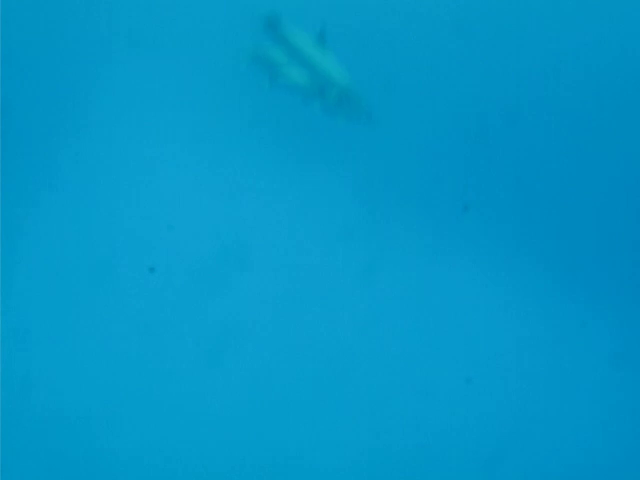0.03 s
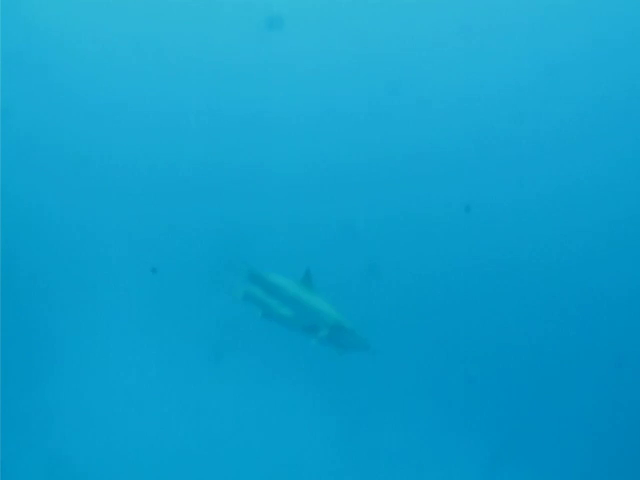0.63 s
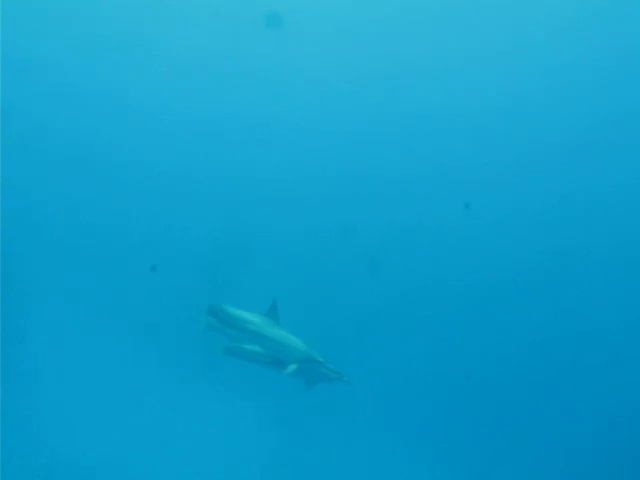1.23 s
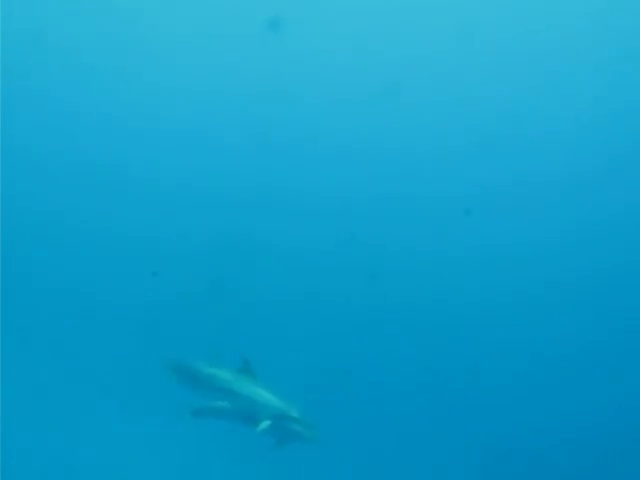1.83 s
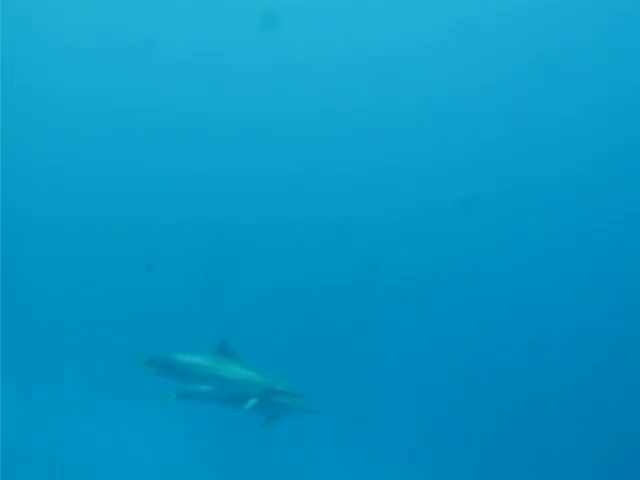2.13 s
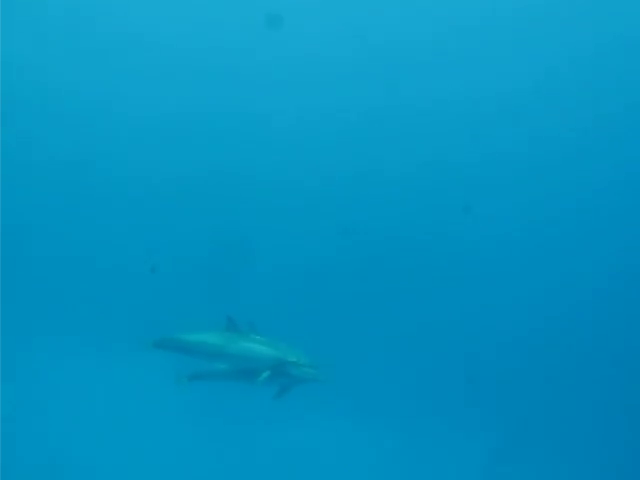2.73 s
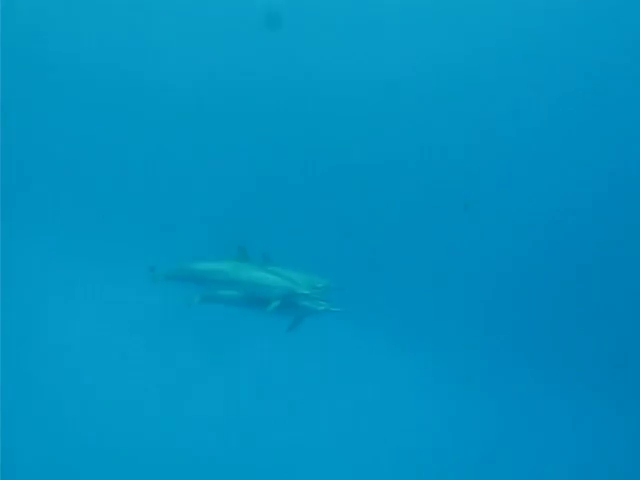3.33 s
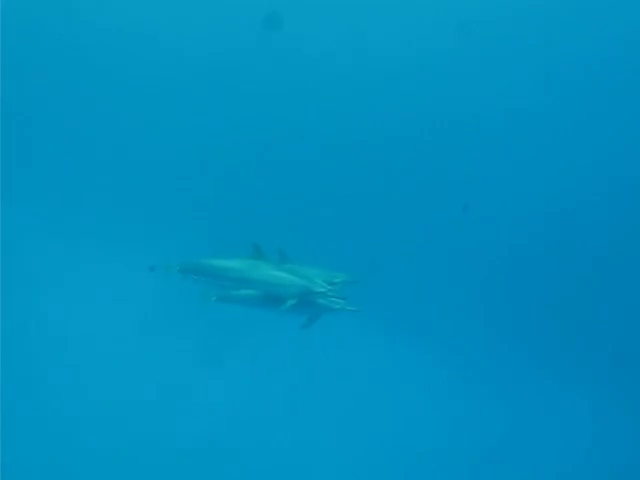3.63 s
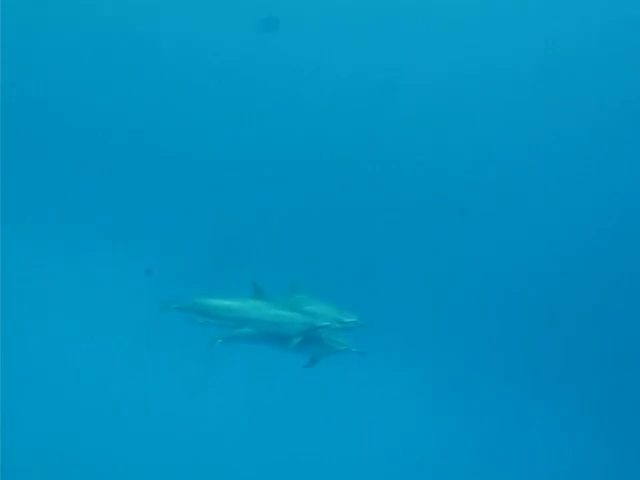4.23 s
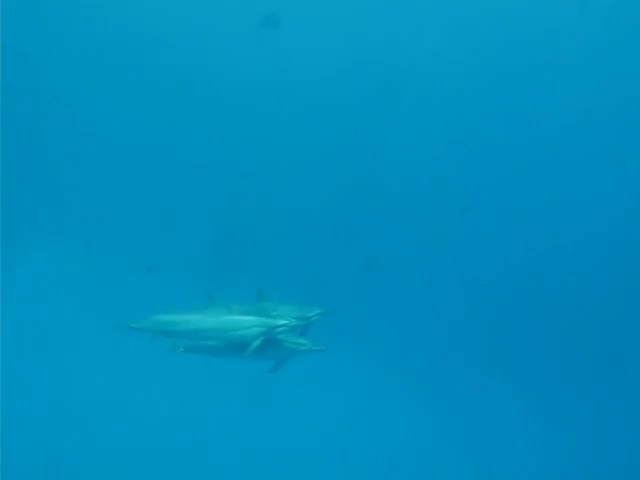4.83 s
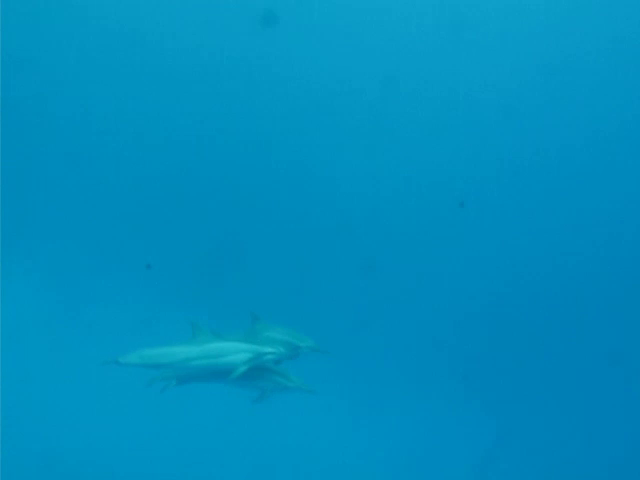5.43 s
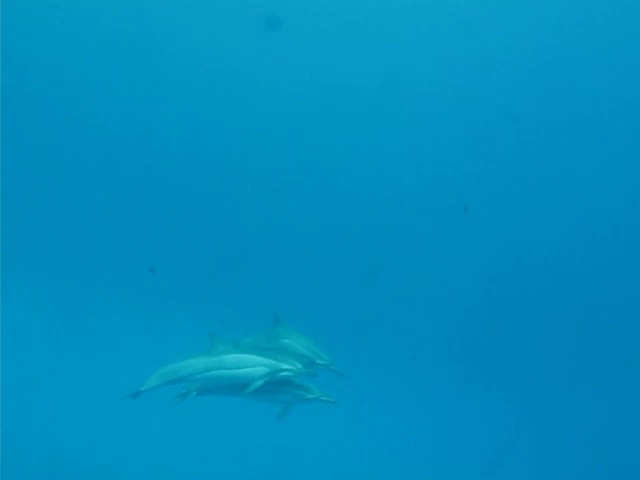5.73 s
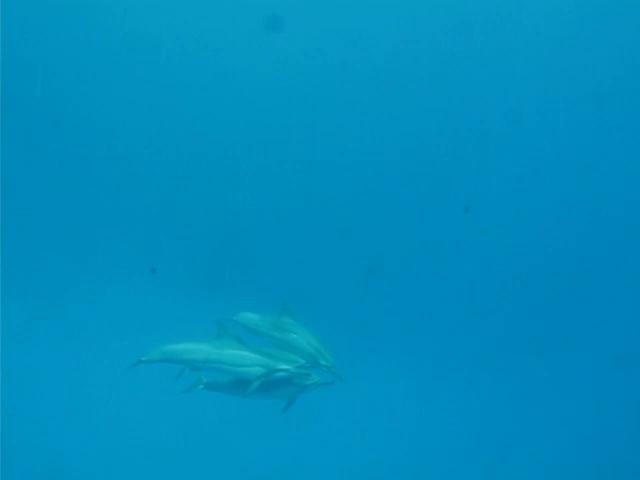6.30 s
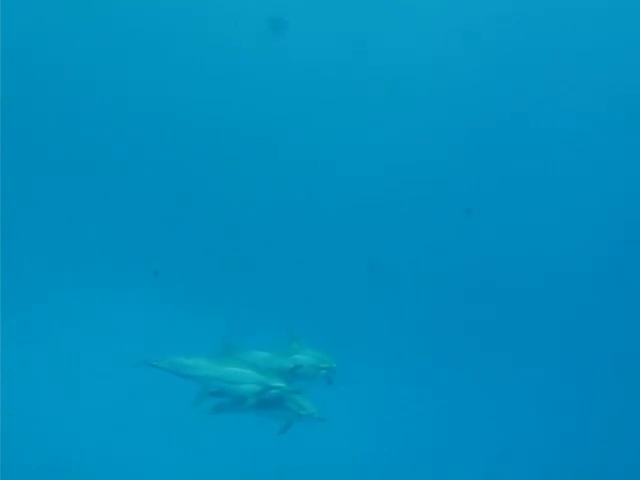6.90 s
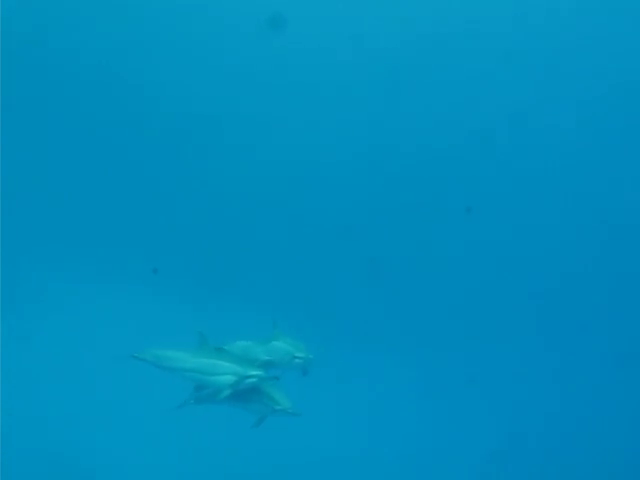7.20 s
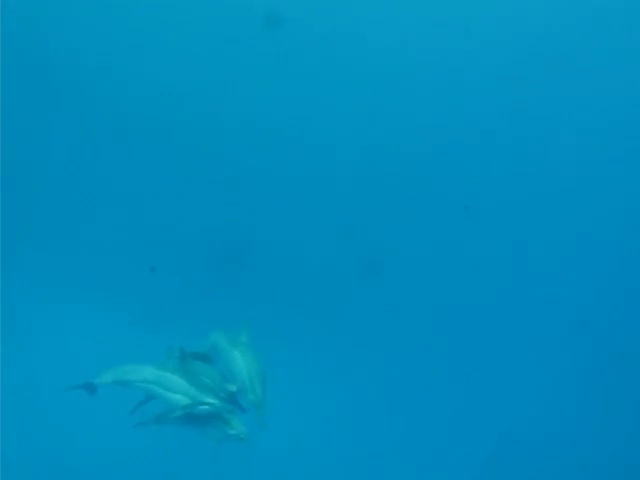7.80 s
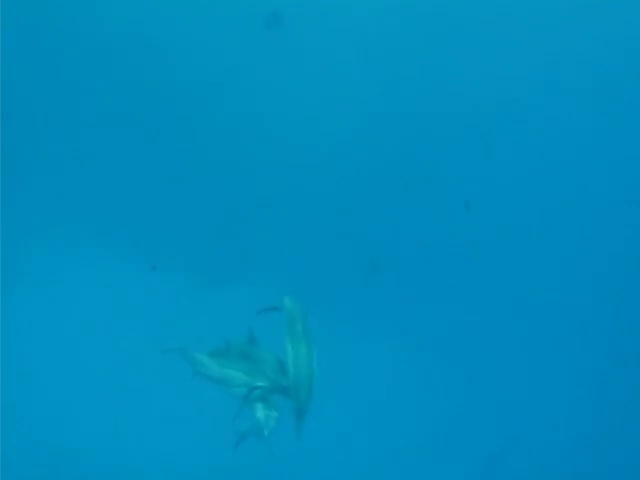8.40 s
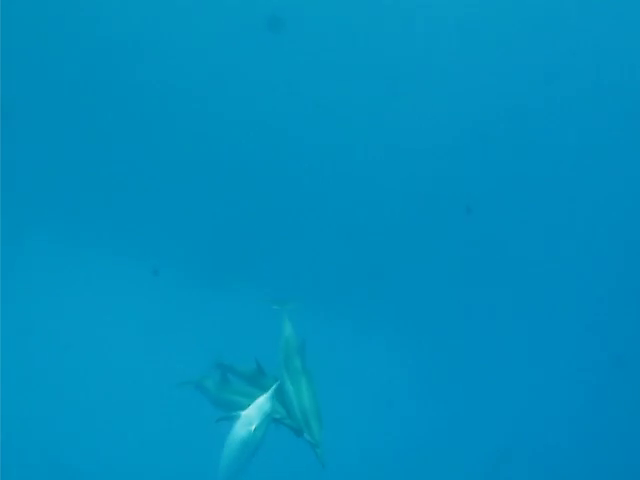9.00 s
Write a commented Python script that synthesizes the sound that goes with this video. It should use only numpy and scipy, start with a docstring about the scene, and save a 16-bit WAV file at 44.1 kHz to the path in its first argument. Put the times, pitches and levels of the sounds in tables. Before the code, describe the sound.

Underwater rumble, hiss and a high electronic whine continue while a camera housing knocks and rubs, and dolphins send out rapid click trains.

```python
"""Under the sea, heard through the enclosed microphone of a camera in a hand-held housing.
Low rumble, hiss, the camera's thin whine and its faint 30 Hz ticking run throughout. From the start
the housing ticks, cracks and rubs right at the microphone, ringing with its own modes, among bubble
pings and sparse snaps. From about 4 s passing dolphins scan it with click trains, and water gurgles
against it. The heaviest blow lands near 7 s; short dolphin buzzes and faint whistles follow."""
import sys
import numpy as np
from scipy import signal
from scipy.fft import rfft, irfft, next_fast_len
from scipy.io import wavfile
from scipy.ndimage import uniform_filter1d

SR = 44100
rng = np.random.default_rng(int(sys.argv[2]) if len(sys.argv) > 2 else 0)


def inscribe(sig):
    """Save sig as 16-bit PCM at rate SR to the path in sys.argv[1].

    A 1-D sig is mono; a 2-D sig holds one channel per row.
    Samples are clipped to [-1, 1] before scaling.
    """
    pcm = np.round(np.clip(np.atleast_2d(sig).T, -1, 1) * 32767)
    wavfile.write(sys.argv[1], SR, pcm.astype(np.int16))


N = 403515
T = np.arange(N) / SR

# Blows on the housing. Each row: start in seconds, level in dB, bass in dB above that,
# frequency that rings most in Hz, treble lost by a soft contact in dB.
KNOCKS = [(0.2142, -26, -14.5, 1090, 1.5), (0.272, -52, 1.5, 1550, 38), (0.665, -44.5, -12, 840, 17),
          (0.673, -50, -10, 1630, 12), (0.738, -42, -10, 2120, 17), (0.946, -52.5, -6, 1110, 21),
          (1.087, -57.5, 2.5, 1360, 16), (1.709, -54, 2.5, 1560, 24), (2.087, -46.5, -22, 1630, 28),
          (3.423, -52.5, -1, 1520, 28), (3.561, -45, -13, 1330, 12), (3.777, -55, 2, 900, 13),
          (4.139, -58.5, -7, 1030, 9), (4.201, -53.5, -20, 1630, 2), (5.253, -52.5, -1, 1590, 30),
          (5.436, -55, 2.5, 1570, 30), (5.49, -57, -7, 1540, 14), (5.737, -47, -10, 1550, 23),
          (5.789, -54, -8, 1680, 3), (5.904, -51.5, -7, 1140, 34), (5.924, -51, 1, 1520, 17),
          (5.944, -51.5, -1, 990, 20), (6.8818, -33.5, -14, 1120, 2), (6.9006, -22, -11, 960, 7.5),
          (7.772, -59.5, 0, 790, 28), (8.696, -49.5, -2.5, 1610, 30), (8.711, -53, -8, 1560, 32)]
# What a dolphin's click rings in the housing wall. Each row: frequency in Hz, width in Hz, level in dB.
WALL_RING = [(5000, 500, -14), (7200, 500, -15), (8800, 450, -11), (9700, 500, -1), (10250, 500, -1),
             (11100, 500, -7), (12700, 600, -12), (13750, 500, -14), (15400, 900, -20)]


def undb(db):
    """Decibels to gain."""
    return 10 ** (np.asarray(db) / 20)


def level(x, db):
    """Scale to an rms level."""
    return x * undb(db) / np.sqrt(np.mean(x ** 2))


def burst_level(x, db):
    """Scale so that the loudest 3 ms have this rms level."""
    return x * undb(db) / np.sqrt(uniform_filter1d(x ** 2, size=132, mode="constant").max())


def add(out, s, x):
    """Mix x into out at time s."""
    i = max(int(s * SR), 0)
    out[i:i + len(x)] += x[:max(N - i, 0)]


def band(x, lo_hz, hi_hz, order=5):
    """Causal band-pass."""
    sos = signal.butter(order, [lo_hz, min(hi_hz, SR / 2 - 1)], "band", fs=SR, output="sos")
    return signal.sosfilt(sos, x)


def noise(colour):
    """Noise of unit rms, its spectrum shaped by (Hz, dB) points."""
    hz, db = np.transpose(colour)
    f = np.fft.rfftfreq(next_fast_len(N, True), 1 / SR)
    gain = undb(np.interp(np.log(f + 1), np.log(hz), db, right=-99))
    white = rng.standard_normal(len(f)) + 1j * rng.standard_normal(len(f))
    return level(irfft(gain * white)[:N], 0)


def walk(rate):
    """Random drift with a spread near 1, turning rate times a second."""
    count = int(T[-1] * rate) + 2
    return np.interp(T * rate, np.arange(count), rng.standard_normal(count))


def ring(resonances, scatter_db, count=700):
    """Short ring of steep (Hz, width in Hz, dB) resonances, their levels scattered at random."""
    hz, width, db = np.transpose(resonances)[:, :, None]
    t = np.arange(count) / SR
    polarity = (-1) ** np.arange(len(hz))[:, None]
    size = width * undb(db + scatter_db * rng.standard_normal(hz.shape)) * polarity
    age = 1.55 * np.pi * width * t
    return (size * age * np.exp(-age) * np.sin(2 * np.pi * hz * t)).sum(0)


def rattle(x, decay_s, share, count=500):
    """Sound bounces along many paths: a dense, short tail smears it with little colouring."""
    tail = rng.standard_normal(count) * np.exp(-np.arange(count) / SR / decay_s)
    tail *= share / np.linalg.norm(tail)
    tail[0] += 1  # the direct path
    phase = np.angle(rfft(tail, 2 * count))
    return signal.fftconvolve(x, irfft(np.exp(1j * phase))[:count])


def background(rumble_db=-65.5, swell_db=0.14, hiss_db=-65):
    """Low water rumble all around, and smooth hiss."""
    # Two spectra. Each row: frequency in Hz, relative level in dB.
    rumble_colour = [(12, -46), (20, 2), (38, 0.5), (70, -4.5), (160, -6), (191, -9), (365, -4.5),
                     (452, -6), (541, -7), (636, -10), (721, -6), (788, -8), (926, -10.5), (1010, -7.5),
                     (1450, -13.5), (1880, -52), (3190, -120)]
    hiss_colour = [(1250, -14), (1500, 3.5), (2100, 1), (3100, 1.5), (3550, 2.5), (4250, -1.5), (5000, 0.5),
                   (6400, -1), (7800, -3.5), (9100, 1.5), (10100, -2), (10800, -8), (12400, -13),
                   (16000, -13.5)]
    rumble = noise(rumble_colour) * undb(rumble_db + swell_db * walk(5.4))
    return rumble + noise(hiss_colour) * undb(hiss_db)


def camera(hum_db=-77, frame_hz=30.002, tick_db=-61.5):
    """Beside the microphone: steady electronic whine, a wavering hum and a faint tick for each frame."""
    # Tones of the whine. Each row: frequency in Hz, rms level in dB.
    whine_tones = [(5880, -55.3), (9234, -80.5), (1681, -81)]
    # What the tick rings. Each row: frequency in Hz, width in Hz, relative level in dB.
    tick_ring = [(2450, 300, -7), (5050, 450, 1.5), (8900, 400, -5), (10000, 450, 0), (11350, 350, -6)]
    whine = sum(level(np.sin(2 * np.pi * hz * T), db) for hz, db in whine_tones)
    hum = level(band(rng.standard_normal(N), 1557, 1706), hum_db)
    ticks = np.zeros(N)
    for s in np.arange(.002, T[-1], 1 / frame_hz):
        add(ticks, s, burst_level(rattle(ring(tick_ring, 1), .002, 5), tick_db))
    return whine + hum + ticks


def grip_swell(s, length, db, attack_s=0.026, fade_db=11, release_s=.045):
    """Envelope of one movement of the hand: attack, a fading hold, release."""
    early, late = np.maximum(s - T, 0), np.maximum(T - s - length, 0)
    progress = np.clip((T - s) / length, 0, 1)
    return undb(db - fade_db * progress) * np.exp(-early / attack_s - late / release_s)


def rubbing(gain_db=-2, grain_db=3, rest_db=-72, restless_db=3.5, jolt_db=-61, jolt_s=0.027):
    """The grip slips in small uneven steps, stirring low modes: a little at rest, more when it moves."""
    # Modes that the hand stirs. Each row: frequency in Hz, width in Hz, relative level in dB.
    rub_modes = [(251, 74, -3.5), (340, 62, -1.5), (531.4, 76, 0), (915, 140, -14.5), (1130, 580, -22),
                 (1516, 140, -8)]
    # Slides of the grip. Each row: start in seconds, length in seconds, relative level in dB.
    slides = [(0.755, 0.11, -60.5), (1.06, .06, -58), (3.393, .05, -61), (4.1, 0.64, -66.5),
              (5.364, 0.03, -58), (5.93, 0.097, -52.5), (6.004, 1, -60), (7.005, 0.068, -64),
              (7.286, 0.11, -60)]
    slips = rng.standard_normal(N) * undb(grain_db * walk(90))
    body = band(signal.fftconvolve(slips, ring(rub_modes, 0, count=4000))[:N], 185, 1620)
    # every blow jolts the grip, a hard one slightly more
    usual_db = np.median([db for _, db, *_ in KNOCKS])
    jolts = [(s, jolt_s, jolt_db + 0.071 * (db - usual_db)) for s, db, *_ in KNOCKS]
    resting = undb(rest_db + restless_db * walk(9))
    power = resting ** 2 + sum(grip_swell(*move) ** 2 for move in slides + jolts)
    return level(body, 0) * np.sqrt(power) * undb(gain_db)


def knocks(crack_db=-1, stress_db=6, middle_db=-1, upper_loss_share=0.32):
    """A blow cracks and rings the housing; where it lands sets the balance of low and high modes."""
    # Modes of the housing. Each row: frequency in Hz, seconds to fall 60 dB, relative level in dB.
    housing_modes = [(259.2, 0.23, -8.5), (381, 0.052, -1), (535, 0.035, -2), (898, 0.029, -0.5),
                     (1210, 0.0078, 8.5), (1600, 0.023, 2.5), (2154, 0.022, -2), (2330, 0.013, 1),
                     (2910, 0.015, 2), (3500, 0.031, -3.5), (3585, 0.019, 0), (4020, 0.02, -2.5),
                     (5580, 0.012, 3.5), (6110, 0.0085, 5.5), (7030, 0.013, 2), (8010, 0.011, 10),
                     (9740, 0.0083, 16), (9700, 0.0047, 13)]
    # Thin blows miss the lowest modes. Each row: the blow's bass in dB, low cutoff in Hz.
    thinness = [(-14, 460), (-12, 235)]
    out, t = np.zeros(N), np.arange(SR // 5) / SR
    hz, t60, db = np.transpose(housing_modes)[:, :, None]
    polarity = (-1) ** np.arange(len(hz))[:, None]
    # bass, middle, upper middle, treble: the crack dies sooner the higher the band
    tops_hz, crack_s = [700, 2150, 5900, 16000], [.003, .002, .0016, .0013]
    impulse = signal.unit_impulse(len(t))
    snap = band(impulse, 227, 10100) + undb(-18) * impulse
    for s, blow_db, bass_db, main_hz, loss_db in KNOCKS:
        lowest_hz = np.interp(bass_db, *np.transpose(thinness))
        stress = stress_db * np.exp(-(np.log(hz / main_hz) / .17) ** 2)
        size = undb(db + stress + rng.standard_normal(hz.shape)) * polarity
        modes = (size * np.exp(-np.log(1000) * t / t60) * np.sin(2 * np.pi * hz * t)).sum(0)
        modes = burst_level(rattle(modes, 0.00093, 1.44)[:len(t)], 0)
        balance_db = [bass_db, middle_db, -upper_loss_share * loss_db, -loss_db]
        for lo, hi, decay_s, part_db in zip([lowest_hz] + tops_hz, tops_hz, crack_s, balance_db):
            crack = burst_level(rattle(snap, decay_s, 8.8)[:len(t)], crack_db)
            add(out, s, burst_level(band(modes + crack, lo, hi), blow_db + part_db))
    return out


def pings(width_hz=260, faint_hz=3400, faint_db=-65, count=45):
    """Each tiny bubble rings for a few milliseconds; many fainter ones come at random."""
    # The clearer bubbles. Each row: start in seconds, pitch in Hz, level in dB.
    clear = [(.243, 3450, -59), (.386, 3530, -59), (.447, 3500, -59), (.612, 3940, -59),
             (0.802, 3380, -50.5), (2.439, 3500, -61), (2.766, 3450, -61), (4.775, 3430, -57),
             (9.063, 3300, -51)]
    faint = [(when * T[-1], faint_hz * 2 ** ((pitch - .5) / 2), faint_db + 6 * (size - .5))
             for when, pitch, size in rng.random((count, 3))]
    out = np.zeros(N)
    for s, hz, db in clear + faint:
        ping = ring([(hz, width_hz, 0)], 0)
        add(out, s, burst_level(rattle(ping, 0.00045, 1), db))
    return out


def crackle(faintest_db=-68, count=36):
    """Sparse snaps, as of snapping shrimp: a few close by, the rest faint and far off."""
    # Snaps close by. Each row: start in seconds, main frequency in Hz, level in dB.
    near = [(2.767, 7500, -61), (4.201, 8800, -44.5), (4.229, 7000, -56)]
    far = [(when * T[-1], 7000 + 4200 * pitch, faintest_db + 9 * size ** 2)
           for when, pitch, size in rng.random((count, 3))]
    out = np.zeros(N)
    for s, hz, db in near + far:
        snap = ring([(hz, 1800, 0), (3400, 900, -6)], 2)
        add(out, s, burst_level(rattle(snap, .001, 2), db))
    return out


def click_times():
    """Each click of a train follows the last by a gap that shrinks as a dolphin closes in."""
    # Sonar trains, one list each. Each row: time in seconds, gap to the next click in seconds.
    trains = [
        [(3.765, .035), (3.835, .03), (3.865, .03), (3.895, .013), (3.93, .013)],
        [(5.5413, .0482), (5.6336, .0413), (5.994, .0382), (6.4424, .0305), (6.535, .0326), (6.9692, .0341),
         (7.0017, .027), (7.04, .027)],
        [(7.4629, .0841), (7.547, .0903), (7.637, .0577), (7.7968, .0437), (7.8854, .0457), (7.9294, .0535),
         (8.0, .0535)],
        [(8.1917, .0816), (8.3466, .0652), (8.4842, .0833), (8.706, .0579), (8.7655, .0643), (8.83, .0485),
         (8.9646, .037), (9.02, .037)],
    ]
    # Single clicks between the trains, each a start in seconds.
    lone_clicks = [5.0295, 5.1465, 5.303, 5.3672, 5.481, 7.045, 7.0982, 7.2836, 8.1563]
    times = list(lone_clicks)
    for train in trains:
        when, gap = np.transpose(train)
        s = when[0]
        while s < when[-1]:
            times.append(s)
            s += np.interp(s, when, gap)
    return times


def click_trains(treble_lift_db=1, echo_s=.0098, echo_db=-13, scatter_db=1.8):
    """Each sonar click rings the wall; the sea surface sends back a weaker, inverted copy."""
    # The lower ring, near 2.6 kHz. Each row: frequency in Hz, width in Hz, relative level in dB.
    body_ring = [(1070, 430, -11), (1520, 230, -14), (2494, 270, 0.5), (2870, 150, -1.5), (4800, 540, -29)]
    # Click strength as the beams sweep over the camera.
    # Each row: time in seconds, treble in dB before its lift, lower ring in dB.
    beam = [(3.85, -64, -64.5), (5.0, -60, -59), (5.6, -66, -63.5), (5.85, -63, -58.5), (6.2, -59.5, -60.5),
            (6.6, -58, -62), (6.9, -51, -65), (7.04, -50.5, -63), (7.1, -60, -68), (7.5, -55, -61),
            (7.65, -53.5, -64), (7.92, -51.5, -60.5), (7.99, -60, -70), (8.33, -57, -54),
            (8.57, -62.5, -57), (8.96, -57, -53.5)]
    out = np.zeros(N)
    when, treble_db, body_db = np.transpose(beam)
    for s in click_times():
        treble = rattle(ring(WALL_RING, 1), .001, 2.2)
        treble = burst_level(treble, np.interp(s, when, treble_db) + treble_lift_db)
        body = rattle(ring(body_ring, 1), .001, 3.8)
        body = burst_level(body, np.interp(s, when, body_db))
        click = (treble + body) * undb(scatter_db * rng.standard_normal())
        add(out, s, click)
        add(out, s + echo_s, -undb(echo_db) * click)
    return out


def gurgles(decay_s=0.011, count=12):
    """Little clusters of low, quickly damped bubbles against the housing."""
    # Bubble clusters. Each row: start in seconds, length in seconds, centre pitch in Hz, level in dB.
    clusters = [(4.455, 0.033, 470, -54), (6.514, 0.028, 345, -46.5), (6.98, 0.066, 410, -47.5),
                (6.99, 0.057, 160, -49.5), (8.675, 0.029, 377, -50.5)]
    out, t = np.zeros(N), np.arange(SR // 8) / SR
    for s, length, hz, db in clusters:
        births = length * (np.arange(count) + rng.random(count))[:, None] / count
        age = np.maximum(t - births, 0)
        pitch = hz * np.exp(.16 * rng.standard_normal((count, 1)))
        bubbles = (np.exp(-age / decay_s) * np.sin(2 * np.pi * pitch * age)).sum(0)
        add(out, s, burst_level(band(bubbles, hz / 2, 2 * hz), db))
    return out


def hollow_tone(start_s=5.92, end_s=6.5, first_hz=270, last_hz=242.5, db=-63.5, waver=0.019):
    """During the long slide of the grip a faint, unsteady tone and its octave swell and sink."""
    out = np.zeros(N)
    u = np.linspace(0, 1, int((end_s - start_s) * SR))
    hz = (first_hz + (last_hz - first_hz) * u) * (1 + waver * walk(117)[:len(u)])
    phase = 2 * np.pi * np.cumsum(hz) / SR
    tone = np.sin(phase) + undb(5) * np.sin(2 * phase)
    add(out, start_s, level(np.sin(np.pi * u) * tone, db))
    return out


def shove(start_s=6.902, hz=75, width_hz=55, db=-50):
    """The heaviest blow shoves the whole housing with a short, deep thump."""
    out = np.zeros(N)
    add(out, start_s, burst_level(ring([(hz, width_hz, 0)], 0, count=4000), db))
    return out


def buzzes(body_db=2, quickening=0.04, arch=.1, scatter_db=3.5):
    """Dolphin clicks so fast that they fuse into a raspy creak."""
    # The buzzes. Each row: start and end in seconds, clicks per second, level in dB.
    creaks = [(6.977, 7.044, 520, -67), (7.052, 7.113, 410, -65), (8.061, 8.173, 546, -63.5),
              (9.006, 9.093, 270, -66.5)]
    # Their broad lower ring. Each row: frequency in Hz, width in Hz, relative level in dB.
    body_ring = [(1150, 730, 4.5), (2720, 650, 3), (4700, 1200, 3.5)]
    out = np.zeros(N)
    for start, end, rate, db in creaks:
        u = np.linspace(0, 1, int((end - start) * SR))
        jitter = .01 * walk(300)[:len(u)]
        click_hz = rate * (1 + quickening * (u - .5) - arch * (2 * u - 1) ** 2 + jitter)
        pulses = np.diff(np.floor(np.cumsum(click_hz) / SR), prepend=0)
        swell = np.sqrt(np.abs(np.sin(np.pi * u)))
        pulses *= swell * undb(scatter_db * rng.standard_normal(len(u)))
        wall = level(ring(WALL_RING, 0.67), 0) + level(ring(body_ring, 1), body_db)
        add(out, start, level(signal.fftconvolve(pulses, rattle(wall, 0.00049, 0.51)), db))
    return out


def whistles(waver=.015):
    """Thin, high, unsteady whistles, mostly rising, smeared by their many paths through the water."""
    # Dolphin calls. Each row: start and end in seconds, first, middle and last pitch in Hz, level in dB.
    calls = [(7.17, 7.28, 12800, 13600, 14600, -82), (7.525, 7.575, 13400, 14000, 14200, -78),
             (8.684, 8.74, 10000, 11250, 12000, -68), (8.716, 8.76, 9900, 9660, 9950, -63.5)]
    out = np.zeros(N)
    for start, end, *contour, db in calls:
        u = np.linspace(0, 1, int((end - start) * SR))
        hz = np.interp(u, [0, .5, 1], contour) * (1 + waver * walk(1300)[:len(u)])
        tone = np.sin(2 * np.pi * np.cumsum(hz) / SR)
        add(out, start, level(np.sin(np.pi * u) * tone, db))
    return rattle(out, 0.012, 2, count=2500)[:N]


def scene():
    """Dolphins, sea, housing and camera meet at one microphone."""
    dolphins = click_trains() + buzzes() + whistles()
    sea = gurgles() + pings() + crackle() + background()
    housing = knocks() + rubbing() + hollow_tone()
    return (dolphins + sea + housing + camera())[None]


def record(dry):
    """The enclosed microphone has one deep notch; the top is cut steeply."""
    notch_hz, top_hz = 11780, 15850
    notched = signal.lfilter(*signal.iirnotch(notch_hz, Q=12, fs=SR), dry)
    return signal.sosfilt(signal.ellip(10, .2, 70, top_hz, fs=SR, output="sos"), notched)


dry = scene()
out = record(dry)
inscribe(out)
```